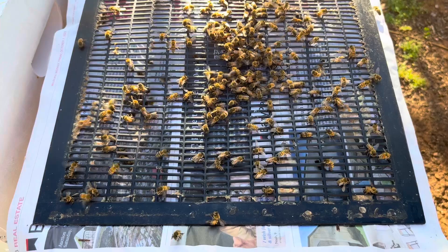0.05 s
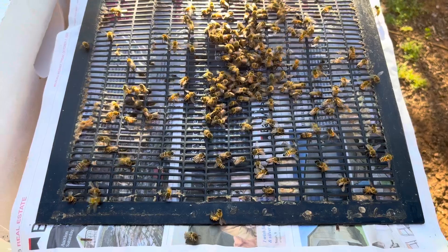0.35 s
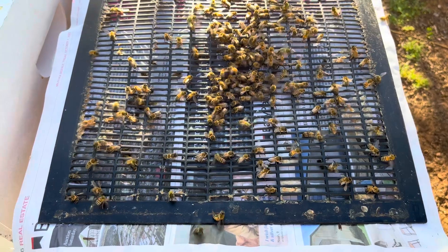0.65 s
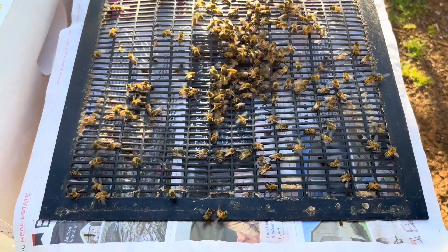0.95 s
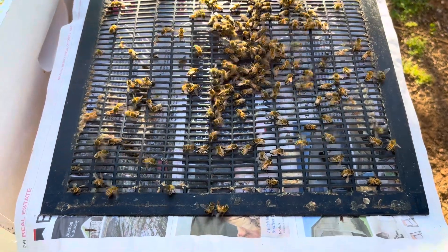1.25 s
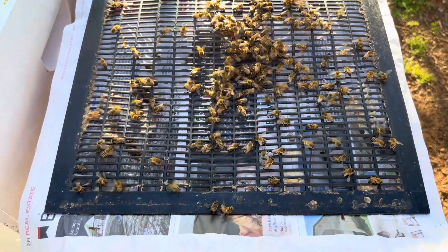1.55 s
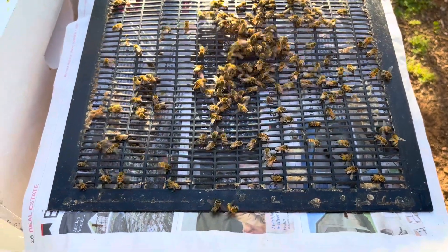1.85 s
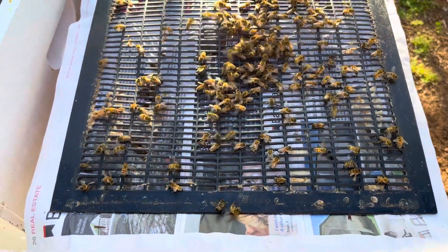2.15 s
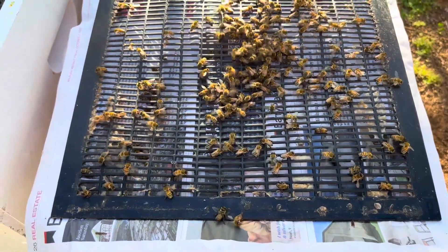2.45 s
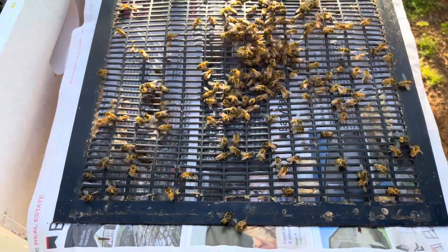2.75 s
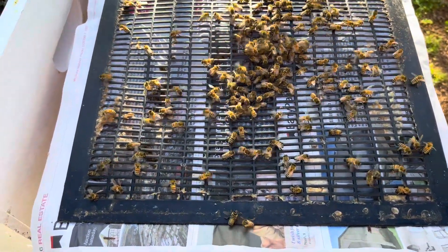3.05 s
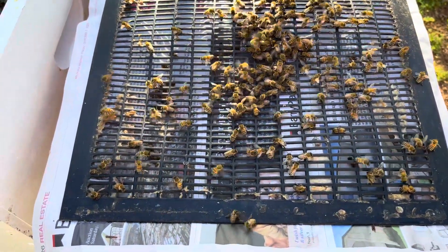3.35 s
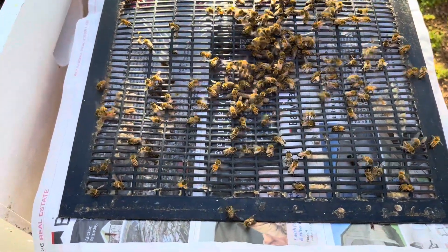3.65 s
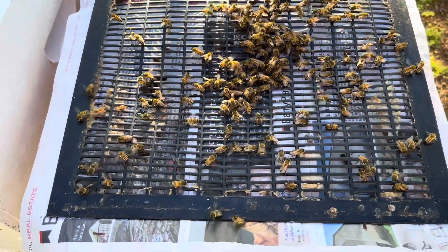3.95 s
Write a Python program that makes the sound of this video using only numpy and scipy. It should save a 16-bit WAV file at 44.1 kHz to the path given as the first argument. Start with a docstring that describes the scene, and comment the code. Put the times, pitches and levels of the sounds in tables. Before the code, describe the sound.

Soft, fizzy rustle of crawling bees outdoors, with small birds chirping and steady wind.

```python
"""Bees crawl over a plastic grid laid on newspaper in a garden; their tiny steps merge into a rustle.
Small birds chirp some way off to the left, each call a quick whistled sweep that the yard scatters,
and a farther flock is heard only as echoes. Under it lie a rumble of wind with one soft gust,
a distant wash and the low hum of a far engine; a faint wavering drone comes in at the end."""
import sys
import numpy as np
from scipy import signal
from scipy.fft import rfft, irfft
from scipy.io import wavfile
from scipy.ndimage import uniform_filter1d

SR = 44100
rng = np.random.default_rng(int(sys.argv[2]) if len(sys.argv) > 2 else 0)


def wav_out(sig):
    """Save sig, one row per channel (or a flat mono array), as 16-bit PCM at SR to the path in sys.argv[1]."""
    wavfile.write(sys.argv[1], SR, np.round(np.clip(np.atleast_2d(sig).T, -1, 1) * 32767).astype(np.int16))


N = 176400
TIME_S = np.arange(N) / SR


def amp(db):
    """Decibels to gain."""
    return 10 ** (np.asarray(db) / 20)


def unit(x):
    """Scales to rms 1."""
    return x / np.sqrt(np.mean(x ** 2) + 1e-20)


def curve_at(points, hz):
    """Reads a curve on a log-frequency axis."""
    freq_hz, value = np.transpose(points)
    return np.interp(np.log(hz + 1), np.log(freq_hz + 1), value)


def add(mix, start_s, sound):
    """Mixes a sound in at its start time."""
    part = mix[max(round(start_s * SR), 0):][:len(sound)]
    part += sound[:len(part)]


def drift(rate_hz, size):
    """Smooth random motion of about unit size."""
    knots = rng.standard_normal(4096)
    return np.interp(np.arange(size) * rate_hz / SR, np.arange(len(knots)), knots)


def equalise(x, eq):
    """Shapes a sound with an EQ curve."""
    return irfft(rfft(x) * amp(curve_at(eq, np.fft.rfftfreq(N, 1 / SR))), N)


# Bright tone of rustling feet and wings: freq_hz, gain_db
RUSTLE_EQ = [(1500, -48), (3000, -2), (6500, 4), (8000, -2), (9200, 5), (11500, 7), (14000, 2.5),
             (15500, -36)]
# Fader ride of the fizz, before its lift: time_s, level_db
FIZZ_RIDE = [(0, -61), (.3, -60.7), (1.28, -61.5), (1.8, -60.7), (2.2, -60.7), (2.55, -61.3), (2.7, -63.5),
             (2.85, -61.5), (3.15, -60.3), (3.3, -61.3), (4, -61)]


def bees(lift_db=4.5, flicker_db=2.0, flicker_hz=30, ticks_per_s=1500, ticks_db=-72, spread_db=2.5):
    """Countless tiny steps merge into a gently swelling fizz, with a faint grain of single ticks."""
    fizz = rng.standard_normal((2, N)) * amp(flicker_db * drift(flicker_hz, N))
    ride = amp(lift_db + np.interp(TIME_S, *np.transpose(FIZZ_RIDE)))
    strength = amp(spread_db * np.minimum(rng.exponential(1, N), 5))
    steps = strength * (rng.random(N) < ticks_per_s / SR)
    pan = rng.random(N) * np.pi / 2
    ticks = steps * np.array([np.cos(pan), np.sin(pan)])
    return ride * unit(equalise(fizz, RUSTLE_EQ)) + amp(ticks_db) * unit(equalise(ticks, RUSTLE_EQ))


def chirp(length_s, start_hz, middle_hz, end_hz, level_db, clarity):
    """A whistle sweeps through three pitches; the lower its clarity, the raspier and shakier it is."""
    attack_s, release_s = .006, .005
    warble_depth, warble_hz, rasp_width_hz = .0233, 348, 850
    t = np.arange(0, length_s, 1 / SR)
    position = 2 * t / length_s - 1
    hz = middle_hz + (np.where(position < 0, start_hz, end_hz) - middle_hz) * abs(position) ** 1.291
    hz *= 1 + warble_depth * (1 - clarity) * drift(warble_hz, len(t))
    tone = np.exp(2j * np.pi * np.cumsum(hz) / SR)
    octave = amp(-11) / (1 + (2 * hz / 7200) ** 20) * tone ** 2  # only low notes carry it
    rasp_share = .75 * (1 - clarity) ** 2
    rasp = drift(2 * rasp_width_hz, len(t)) + 1j * drift(2 * rasp_width_hz, len(t))
    voice = (np.sqrt(1 - rasp_share) + np.sqrt(rasp_share) * rasp) * (tone + octave)
    envelope = np.clip(t / attack_s, 0, 1) * np.clip((length_s - t) / release_s, 0, 1)
    return amp(level_db) * envelope * unit(voice.real)


# Bird calls, before the direct and echo gains; clarity runs from 0 (raspy, scattered) to 1 (pure, direct):
# start_s, length_s, start_hz, middle_hz, end_hz, level_db, clarity
BIRD_CALLS = [ (0.029, 0.025, 5450, 4580, 3460, -47, 0), (.058, 0.054, 3660, 5070, 3980, -47.5, 0.055),
              (.15, 0.034, 3650, 4750, 6030, -50, 0), (.232, 0.022, 3820, 4530, 5530, -52, 0.34),
              (.311, 0.023, 3650, 4360, 5500, -52.5, 0.65), (.474, 0.034, 5380, 4670, 3500, -54.5, 0.082),
              (.53, .08, 4000, 3480, 3680, -60.5, 0), (.625, 0.035, 3400, 4020, 5230, -51.5, .1),
              (0.655, 0.065, 5920, 5930, 5530, -54, 0.58), (.658, 0.03, 5260, 5300, 5400, -47.5, 0.65),
              (.684, 0.019, 4250, 4400, 4420, -42, 0.29), (.732, 0.054, 3725, 4400, 4140, -49, 0.073),
              (.745, 0.046, 4950, 5050, 4950, -47, 0.59), (.803, 0.056, 4700, 3700, 2750, -53.5, .1),
              (.928, .018, 3800, 4350, 5600, -42.5, 0.56), (.932, 0.029, 5530, 6030, 5940, -45.5, .45),
              (0.953, 0.037, 3914, 4580, 4640, -45, 0.11), (1.015, 0.022, 3880, 4470, 5530, -43, 0.29),
              (1.024, 0.056, 4100, 3590, 3120, -50.5, 0.13), (1.091, 0.0274, 3490, 4550, 4300, -43.5, 0.47),
              (1.239, 0.06, 5200, 4960, 3550, -52.5, 0.073), (1.309, 0.044, 5060, 5700, 4830, -48, 0.42),
              (1.345, 0.028, 3760, 4370, 4170, -45, 0.37), (1.395, 0.035, 3770, 4950, 3870, -45.5, .3),
              (1.513, .037, 4560, 4850, 4100, -53, 0.14), (1.779, 0.07, 3190, 3900, 2930, -58, 0),
              (1.865, 0.063, 4300, 5440, 4870, -48, 0), (1.925, 0.037, 3730, 4500, 5670, -42.5, 0.022),
              (1.938, .036, 5710, 5970, 3740, -48, 0.37), (1.975, 0.028, 4770, 4760, 4770, -43, 0.44),
              (2.016, .025, 3730, 4600, 4070, -44, 0.41), (2.039, 0.066, 3005, 3360, 3504, -51.5, 0.48),
              (2.092, .022, 3350, 4260, 5700, -43.5, 0.25), (2.117, 0.041, 3730, 2970, 2490, -53.5, 0.4),
              (2.242, 0.03, 4640, 4560, 4630, -43, 0.75), (2.319, .013, 3450, 2940, 2750, -48, 0.53),
              (2.355, 0.049, 4480, 4700, 4500, -56.5, 0.65), (2.545, 0.028, 4600, 4620, 4550, -45.5, 0.6),
              (2.62, .03, 3030, 3540, 4370, -54.5, 0.023), (2.733, 0.12, 7320, 6440, 7300, -62.5, 0.03),
              (2.74, 0.058, 3900, 5380, 4170, -59.5, 0), (2.873, 0.033, 4360, 4620, 4540, -53.5, .6),
              (2.905, 0.039, 4220, 5400, 4420, -53.5, 0.37), (2.956, 0.026, 3900, 3620, 3220, -52.5, 0.49),
              (2.997, 0.058, 4610, 5200, 3630, -53.5, 0.25), (3.081, 0.039, 3930, 4880, 6030, -49.5, 0),
              (3.155, 0.043, 4650, 4050, 3530, -48, 0.34), (3.216, 0.023, 3170, 3400, 4500, -44, 0.8),
              (3.236, 0.022, 4220, 3500, 3020, -45, 0.47), (3.394, 0.053, 3970, 5300, 5650, -49, 0.054),
              (3.435, 0.034, 4680, 4330, 4130, -49, 0.38), (3.487, 0.041, 3820, 5120, 4200, -46.5, 0.07),
              (3.55, 0.032, 4740, 4630, 3800, -51, 0.23), (3.62, 0.05, 3410, 3595, 2890, -53.5, 0.29),
              (3.918, 0.047, 4230, 5800, 4700, -52.5, 0.041)]


def birds(left_db=3, right_db=-5.5, right_lag_s=.00042):
    """The nearer birds: clear notes arrive directly from the left, the others mostly as echoes."""
    direct, scattered = np.zeros((2, N))
    for start_s, *call, clarity in BIRD_CALLS:
        note = chirp(*call, clarity)
        add(direct, start_s, clarity * note)
        add(scattered, start_s, np.sqrt(1 - clarity ** 2) * note)
    left = amp(left_db) * direct
    right = amp(right_db) * np.roll(direct, round(right_lag_s * SR))
    return np.array([left, right]) + yard_echoes(scattered)


def yard_echoes(send, echoes_per_s=2000, early_t60_s=.115, late_t60_s=.65, late_db=-13):
    """Walls and trees scatter a call into a quick cluster of echoes and a faint long tail."""
    t = np.arange(SR) / SR
    taps = rng.standard_normal((2, SR)) * (rng.random((2, SR)) < echoes_per_s / SR)
    tail = taps * (amp(-60 * t / early_t60_s) + amp(late_db - 60 * t / late_t60_s))
    tail /= np.linalg.norm(tail, axis=1, keepdims=True)
    return signal.fftconvolve(send[None], tail, axes=1)[:, :N] * amp([[4.5], [-2.5]])  # leans left


def flock(calls_per_s=55, level_db=-61.5, centre_hz=4200, spread=.27, arch=.2203, length_s=.0333):
    """Farther birds chirp at random, heard only as echoes."""
    song = np.zeros(N)
    for when, pitch, fall in rng.random((int(calls_per_s * N / SR), 3)):
        peak_hz = centre_hz * (1 + spread * (2 * pitch - 1))
        start_hz, end_hz = peak_hz * (1 - arch), peak_hz * (1 - arch * fall)
        add(song, when * N / SR, chirp(length_s, start_hz, peak_hz, end_hz, level_db=0, clarity=0))
    return amp(level_db) * unit(yard_echoes(song))


# Bass-heavy tone of the wind and distant wash: freq_hz, gain_db
WIND_EQ = [(20, -1), (33, -14), (42, -7), (55, -12), (72, 4.5), (92, 3), (114, -25), (135, -1), (165, -4),
           (190, -15.5), (243, -11), (262, -6), (330, -4.5), (370, -17), (410, -9.5), (500, -9),
           (700, -18.5), (880, -12.5), (1250, -21), (2300, -27.5), (5000, -24.5), (8000, -35.5),
           (15000, -50.5)]
# Swells below and above the crossover: time_s, rumble_gain_db, wash_gain_db
WIND_SWELLS = [(0, 3, 2), (.7, 2, 0), (1.4, -4, 1.5), (1.9, -1, 0.5), (2.25, 0.5, -0.5), (2.7, 0.5, 0.5),
               (3.1, 0.5, 1), (3.552, -0.5, 0.8), (3.75, 2.5, 3), (4, 2, 2)]
# Stereo image, centred in the bass and wide above: freq_hz, left_right_correlation
WIND_IMAGE = [(60, 0.95), (150, 0.79), (330, 0.78), (700, 0.44), (1300, 0.0044), (3000, 0.032),
              (12000, -0.7)]
# Stereo balance: freq_hz, left_minus_right_db
WIND_BALANCE = [(60, -1), (200, -1), (400, 1), (1300, 1.5), (2300, -2.5), (12000, 4)]


def wind(level_db=-47, crossover_hz=200, patchy_db=1.52):
    """Wind rumble and a distant wash swell separately, in noise that shifts in soft patches."""
    window, hop = 2048, 512
    frame_s = np.arange(N // hop + 5) * hop / SR
    hz = np.fft.rfftfreq(window, 1 / SR)[:, None]
    noise = rng.standard_normal((len(frame_s), len(hz), 5)).T
    left, independent = noise[0] + 1j * noise[1], noise[2] + 1j * noise[3]
    correlation = np.clip(curve_at(WIND_IMAGE, hz), -1, 1)
    right = correlation * left + np.sqrt(1 - correlation ** 2) * independent
    patches = uniform_filter1d(noise[4], size=14, axis=0)  # smooth over frequency, then over time
    patches = unit(uniform_filter1d(patches, size=9, axis=1))
    time_s, rumble_db, wash_db = np.transpose(WIND_SWELLS)
    rumble_share = 1 / (1 + (hz / crossover_hz) ** 4)
    swell_db = rumble_share * np.interp(frame_s, time_s, rumble_db)
    swell_db += (1 - rumble_share) * np.interp(frame_s, time_s, wash_db)
    gain = amp(curve_at(WIND_EQ, hz) + swell_db + patchy_db * patches)
    lean = amp(curve_at(WIND_BALANCE, hz) / 2)
    spectra = gain * np.array([left * lean, right / lean])
    _, bed = signal.istft(spectra, nperseg=window, noverlap=window - hop)
    return amp(level_db) * unit(bed[:, :N])


def gust(start_s=2.268, length_s=.042, level_db=-44, band_hz=(75, 220)):
    """A soft gust lands as one short, low puff."""
    t = np.arange(0, length_s, 1 / SR)
    band = signal.butter(2, band_hz, "band", fs=SR, output="sos")
    puff = unit(signal.sosfilt(band, rng.standard_normal(SR))[-len(t):])
    track = np.zeros(N)
    add(track, start_s, amp(level_db) * puff * np.sin(np.pi * t / length_s))
    return track


def hum(ride, partials, waver, flutter_db, flutter_hz):
    """Sine partials follow one pitch curve, each wavering on its own in pitch and level."""
    time_s, pitch_hz, level_db = np.transpose(ride)
    glide_hz = np.interp(TIME_S, time_s, pitch_hz)
    tone = np.zeros(N)
    for ratio, gain_db in partials:
        cycles = np.cumsum(ratio * glide_hz * (1 + waver * drift(flutter_hz, N))) / SR
        gain = amp(gain_db + flutter_db * drift(flutter_hz, N))
        tone += gain * np.sin(2 * np.pi * (cycles + rng.random()))
    return np.sqrt(2) * tone * amp(np.interp(TIME_S, time_s, level_db))


# Speed and fader ride of the engine: time_s, firing_rate_hz, level_db
ENGINE_RIDE = [(0, 66.3, -64), (.3, 65.88, -48), (1.05, 64.43, -46.5), (1.3, 65, -48.5),
               (1.8, 64.83, -48.5), (2.6, 64.84, -51), (3.1, 66.9, -53.5), (3.5, 65.4, -59), (4, 69, -68)]
# Partials of its hum, with gains on top of the ride: pitch_ratio, gain_db
ENGINE_PARTIALS = [(1, -0.5), (1.45, -9.5), (2, -10)]


def engine():
    """A far engine hums at its firing rate, swelling quickly and fading slowly."""
    return hum(ENGINE_RIDE, ENGINE_PARTIALS, waver=.016, flutter_db=1, flutter_hz=8.87)


# Pitch and fader ride of the closing drone: time_s, pitch_hz, level_db
DRONE_RIDE = [(3.55, 274.3, -100), (3.68, 272.8, -64), (3.78, 277.2, -64.5), (3.87, 283.4, -63),
              (4, 289.4, -58.5)]
# Partials of the drone, with gains on top of the ride: pitch_ratio, gain_db
DRONE_PARTIALS = [(1, 3.5), (3, 1.5), (6, -19)]


def drone():
    """A faint drone, perhaps a bee's wings, flutters differently on each side."""
    sides = [hum(DRONE_RIDE, DRONE_PARTIALS, waver=.022, flutter_db=6.5, flutter_hz=41) for _ in range(2)]
    return np.array(sides)


def scene():
    """The garden in stereo: close bees and the birds over a low bed."""
    bed = wind() + gust() + engine() + drone()
    return bed + bees() + birds() + flock()


def record(dry):
    """A low cut tames the wind, the sound snaps on just after the start, and a high cut trims the top."""
    low_cut_hz, high_cut_hz = 35, 14700
    start_s, fade_s = .0355, .0014
    low_cut = signal.butter(4, low_cut_hz, "high", fs=SR, output="sos")
    high_cut = signal.firwin(511, high_cut_hz, window=("kaiser", 9), fs=SR)
    fade_in = np.clip((TIME_S - start_s) / fade_s, 0, 1)
    return signal.oaconvolve(fade_in * signal.sosfilt(low_cut, dry), high_cut[None], "same")


dry = scene()
out = record(dry)
wav_out(out)
```